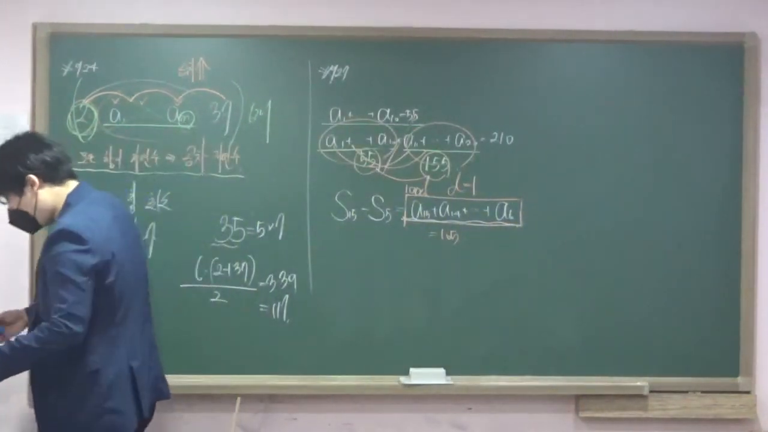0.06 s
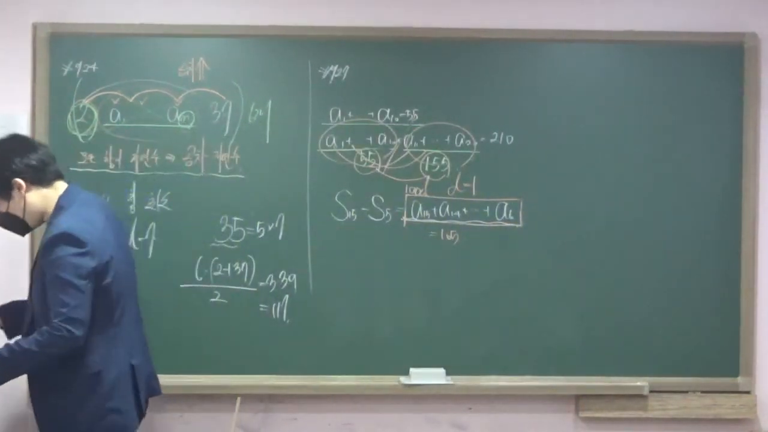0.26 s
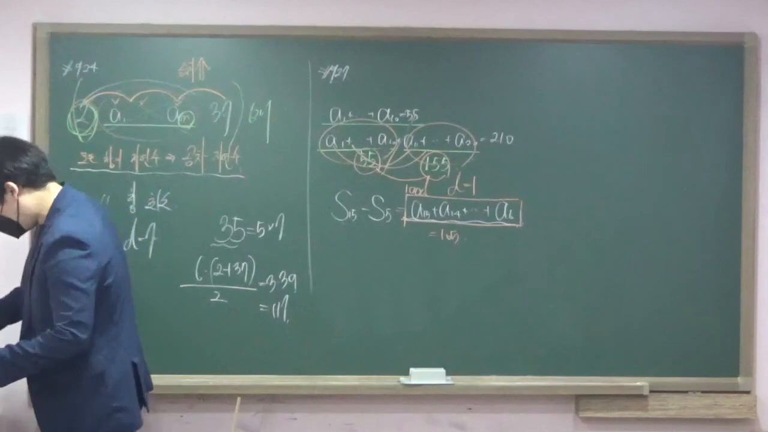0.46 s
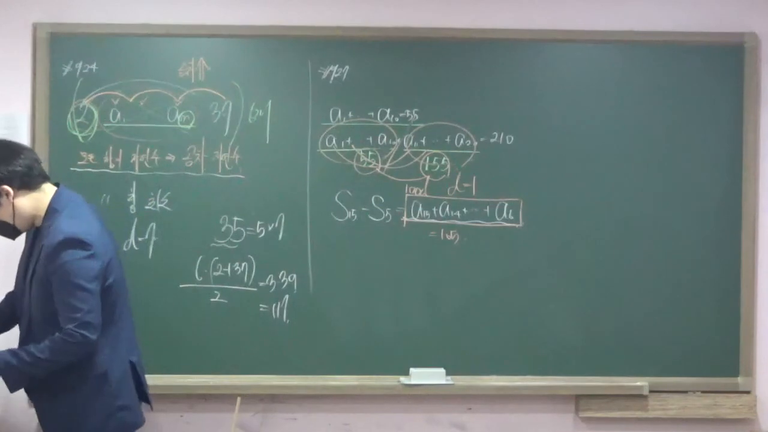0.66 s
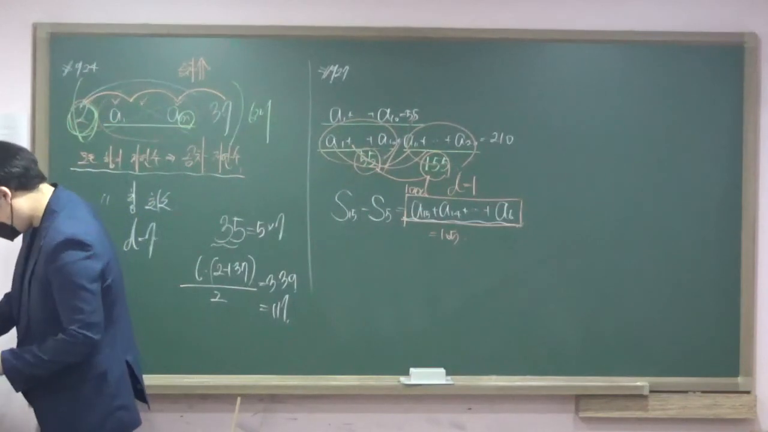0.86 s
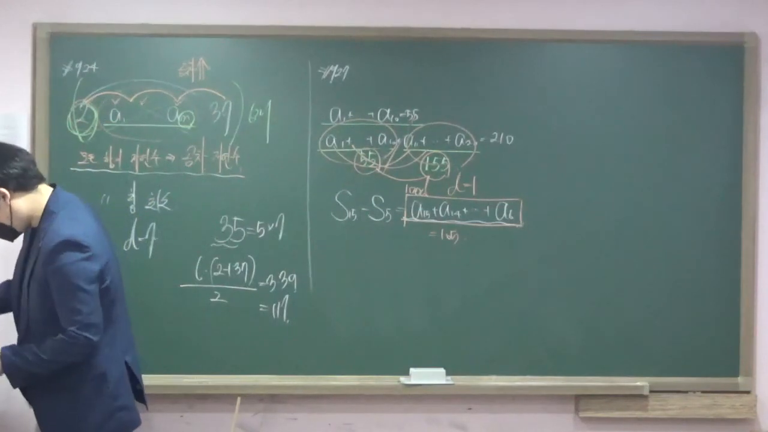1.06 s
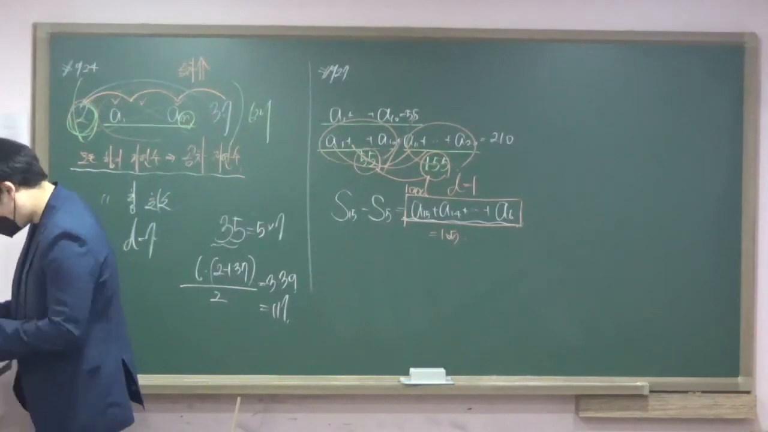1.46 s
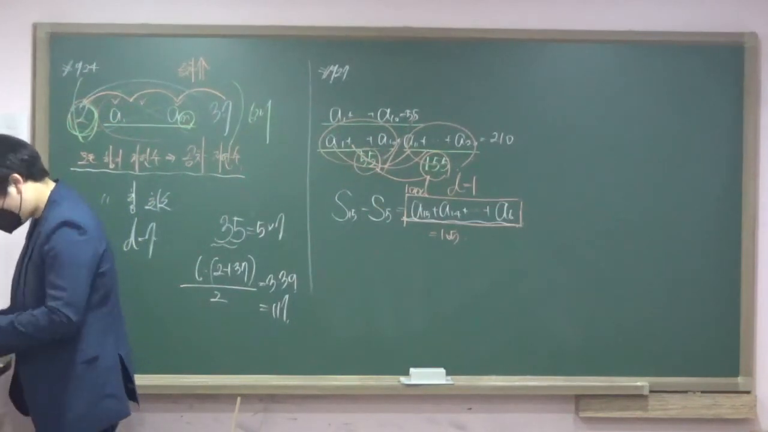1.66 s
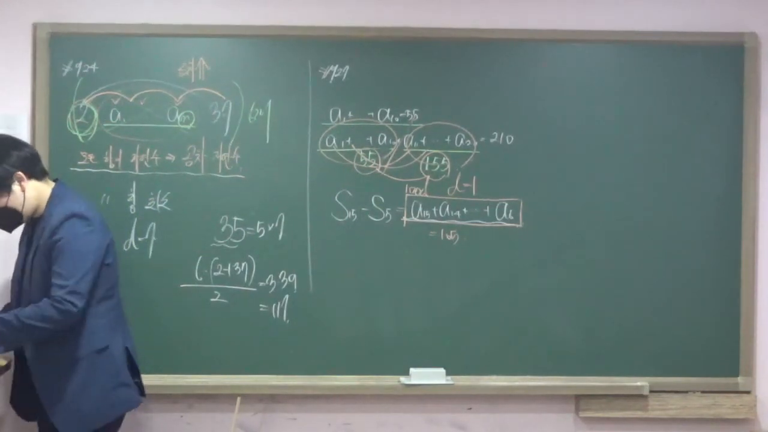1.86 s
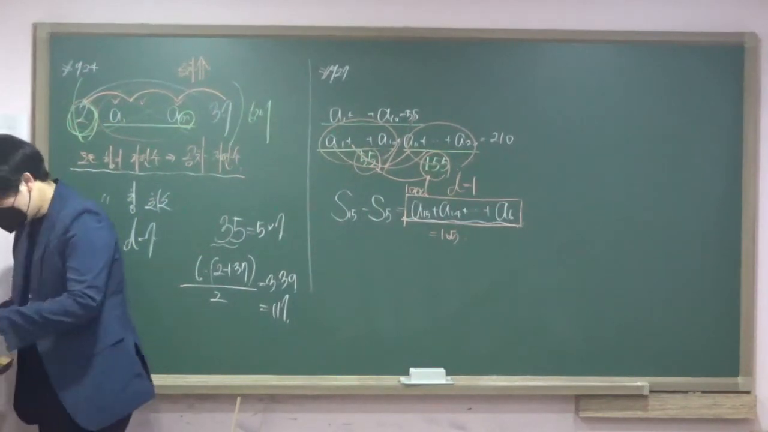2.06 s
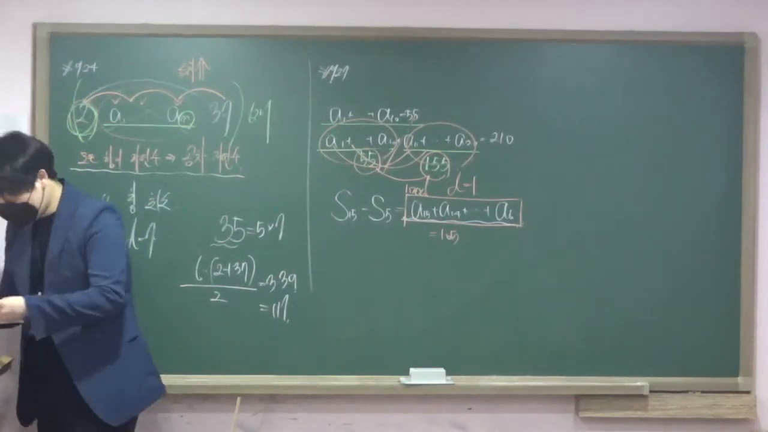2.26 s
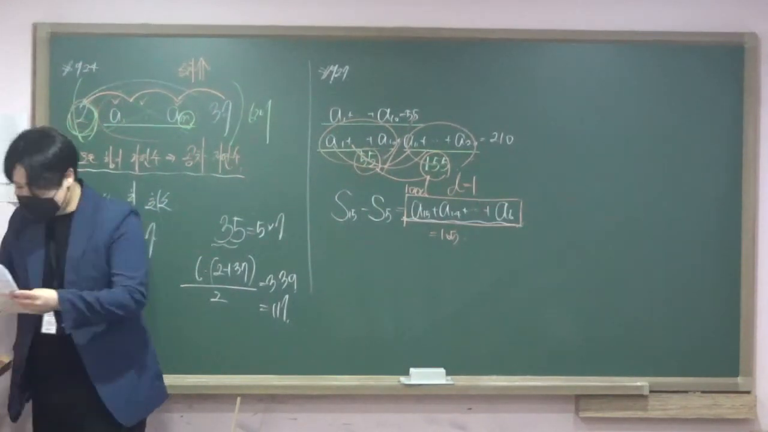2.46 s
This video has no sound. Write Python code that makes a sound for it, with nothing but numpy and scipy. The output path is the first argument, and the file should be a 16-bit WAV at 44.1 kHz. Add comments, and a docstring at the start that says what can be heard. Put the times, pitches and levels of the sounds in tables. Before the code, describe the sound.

Objects knock on a hollow desk, with sharp, ringing clacks at about 0.2, 0.5 and 0.8 seconds and paper sliding faintly between them. From 0.9 to 1.2 seconds the loudest knock breaks into a quick clatter as the object settles. Afterwards papers rustle softly with faint low bumps, tapping the desk between 1.6 and 2 seconds and sliding again near 2.5. Everything echoes in a classroom over low, steady ventilation.

```python
"""You hear things knocked and set down on a hollow desk in a bare classroom, and papers picked up.
Each knock makes a clack that rings the desk and echoes round the room; the last and heaviest one
clatters as the object settles. Between and after the knocks, paper rubs and taps on the desk and
soft bumps hum briefly. The ventilation adds a low, steady rush of air."""
import sys
import numpy as np
from scipy import signal
from scipy.fft import rfft, irfft
from scipy.io import wavfile

SR = 44100
rng = np.random.default_rng(int(sys.argv[2]) if len(sys.argv) > 2 else 0)


def dump_mix(stems):
    """Bounce the given channels to the path in sys.argv[1] as a 16-bit WAV at rate SR."""
    frames = np.atleast_2d(stems).T  # one column per channel
    limited = np.clip(frames, -1, 1)  # hard clip at full scale
    pcm = np.round(limited * 32767).astype(np.int16)
    wavfile.write(sys.argv[1], SR, pcm)


N = 114660
LEAD = 8820  # extra samples at the front, so a sound can begin before time zero
M = N + LEAD
AGE = np.arange(M) / SR  # seconds since a sound began
T = (np.arange(M) - LEAD) / SR  # seconds on the scene's clock
FREQ = np.maximum(np.arange(M + 1) * SR / (2 * M), 1)
SIDES = np.array([[1], [-1]])  # left ear = mid + side, right ear = mid - side

# Blows on the desk: t/s, level/dB, bass/dB, treble/dB, desk ring/dB, chatter fade/s,
# pitch of the struck spot/Hz, boost at that pitch/dB, crack/dB
KNOCK_BLOWS = [(-.03, -17.5, 13.5, 7.5, -17, 0.0067, 1190, 7, -36),
               (.214, -4.5, 7, 0.5, 1, 0.009, 1270, 6.5, -2),
               (0.255, -13.5, -1, 4, 1.5, 0.0053, 787, 11, 0),
               (0.416, -30, -20, -24, 13, .005, 1230, -3, -22),
               (.518, -8, 5.5, 7.5, 2.5, 0.01, 2090, 5, -8.5),
               (.553, -18.5, 9, 13, 2.5, .004, 1550, -8, -9),
               (0.79, -8.5, 6.5, 5, -5.5, 0.0076, 4630, 6.5, -12.5),
               (.844, -23.5, -4, 8, -0.5, 0.0056, 897, 20, -1.5),
               (.919, -9.5, 7.5, -17, 6, 0.005, 1194, 17, -2),
               (.956, -3, -5.5, 1.5, 0.5, 0.0041, 1900, 5, -8),
               (.977, 0, -10, -9.5, 2.5, 0.0088, 1360, 1, -24),
               (1.022, -6, -18, 3.5, -6.5, 0.013, 1050, -6, -3.5),
               (1.052, -4, 1, -6, 2, 0.011, 2200, 10.5, -12),
               (1.090, -4.5, -10.5, -1, -3.5, 0.0095, 1520, 3, -16),
               (1.127, -7.5, -9, -7, 3, 0.0029, 1370, 4.5, -14),
               (1.195, -36.5, -8, 6, -15, 0.01, 1670, 1, -6)]
# How much the two ears differ in the room: f/Hz, side compared with mid/dB
STEREO_WIDTH = [(60, -20), (170, -24), (240, -23.5), (330, -16.5), (550, -9), (2000, -6.5), (4000, -6.5),
                (9000, -8.5)]


def knocks(rooms, gain_db=23, spot_octaves=0.17, crack_rise_s=.006, crack_fade_s=0.014):
    """Each blow sends a clack round the room and a short crack straight to the listener."""
    # Tone of a knock: f/Hz, level/dB
    knock_tone = [(40, -10.5), (120, -9.5), (170, -2.5), (225, 3.5), (310, -3.5), (450, -1), (650, 4),
                  (850, 8), (1200, 5), (1600, 8), (2000, 2), (2500, 0), (3200, -4.5), (5000, -15),
                  (7500, -19.5), (11000, -30)]
    treble_lift_db = 1 / (1 + (5630 / FREQ) ** 2)
    crack_shape = np.exp(-AGE / crack_fade_s) * (1 - np.exp(-AGE / crack_rise_s))
    out = 0
    for k, (start, db, bass, treble, _, fade, spot_hz, spot_db, crack_db) in enumerate(KNOCK_BLOWS):
        # The spot that is struck boosts or weakens the sound near one pitch.
        spot = spot_db * np.exp(-.5 * (np.log2(FREQ / spot_hz) / spot_octaves) ** 2)
        tone = at(knock_tone, FREQ) + spot
        clack = colour(contact(fade), tone + blow_tone(FREQ, bass, treble))
        crack = colour(unit(rng.standard_normal(M) * crack_shape), tone + treble_lift_db)
        knock = echo(clack, rooms[k % len(rooms)]) + undb(crack_db) * crack
        out = out + undb(db + gain_db) * place(knock, start)
    return out


def contact(fade_s, chatter_db=-3):
    """Two things meet: a sharp push, then a brief chatter of the touching faces."""
    push = undb(chatter_db) * unit(rng.standard_normal(M) * np.exp(-AGE / fade_s))
    push[0] += 1
    return unit(push)


def blow_tone(hz, bass_db, treble_db):
    """Turn a blow's bass and treble up or down in dB, so it sounds deeper, duller or brighter."""
    return bass_db / (1 + (hz / 577) ** 4) + treble_db / (1 + (2040 / hz) ** 4)


def desk_ring(gain_db=-23, build_s=0.015, waver_hz=35, waver=.55, spread=0.35):
    """Every blow rings the same desk notes; the room makes them waver, differently in each ear."""
    # The desk's own notes, kept going by the room: f/Hz, level/dB, time to fade by 60 dB/s
    desk_notes = [(226.4, -6, 0.61), (436.8, -3.5, 0.28), (537, -7.5, 0.76), (568, 0.5, 0.3),
                  (761, -5.5, 0.9), (818, -13, 1), (848, -9, 1), (1141, 1, 0.47), (1187, 2.5, 0.56),
                  (1362, -2.5, 0.49), (1507, 0.5, 0.44), (1554, 2, 0.47), (1628, 6, 0.38),
                  (1922, 1.5, 0.38)]
    times, db, bass, treble, ring_db, *_ = np.array(KNOCK_BLOWS).T
    starts = np.round(times * SR).astype(int) + LEAD
    out = 0
    for hz, note_db, t60 in desk_notes:
        strength = undb(db + ring_db + note_db + blow_tone(hz, bass, treble))
        blows = np.zeros(M, complex)
        blows[starts] = strength * np.exp(2j * np.pi * rng.random(len(times)))
        step = np.exp((2j * np.pi * hz - np.log(1000) / t60) / SR)  # one sample of swinging and fading
        ring = signal.lfilter([1], [1, -step], blows)
        # Taking away a faster-fading copy makes the note swell in.
        ring -= signal.lfilter([1], [1, -step * np.exp(-1 / (build_s * SR))], blows + 1e-18)
        mid, side = (wander(waver_hz) + 1j * wander(waver_hz) for _ in range(2))
        out = out + (ring * (1 + waver * mid + SIDES * spread * side)).imag
    return undb(gain_db) * out


def paper(room, slide_db=-38, release_s=.02, crinkle_db=6.5, crinkle_hz=250.7, tap_db=-4):
    """Sheets slide with a crinkly hiss, and the stack taps on the desk."""
    # Sliding sheets: t/s, swell/s, hold/s, level/dB
    slides = [(-.05, 0.032, 0.11, -3), (0.292, 0.028, 0.4, -1), (0.92, 0.011, 0.11, 9),
              (1.262, 0.07, 0.16, -11), (1.492, 0.038, 0.25, -13), (1.757, 0.034, 0.031, -4),
              (1.854, 0.058, 0.03, -3.5), (2.04, 0.043, 0.089, -17.5), (2.41, 0.19, .1, -11.5)]
    # Light taps of the stack: t/s, level/dB, chatter fade/s
    stack_taps = [(.189, 2, 0.0066), (1.606, -9, .008), (1.81, -1, 0.01), (1.957, 1, 0.0034)]
    # Tone of paper: f/Hz, level/dB
    paper_tone = [(100, -10), (500, -18.5), (1200, 5), (2400, 4), (3600, -1.5), (6000, -3.5), (8500, -12.5),
                  (11000, -16)]
    effort = taps = 0
    for start, swell, hold, db in slides:
        rise = np.clip((T - start) / swell, 0, 1)
        fall = np.exp(-np.maximum(T - start - swell - hold, 0) / release_s)
        effort = effort + undb(db) * rise * fall
    hiss = undb(slide_db + crinkle_db * wander(crinkle_hz)) * effort * rng.standard_normal(M)
    for start, db, fade in stack_taps:
        tap = undb(tap_db + db) * contact(fade, chatter_db=10.5)
        taps = taps + place(tap[None], start)[0]
    hiss, taps = colour(np.array([hiss, taps]), at(paper_tone, FREQ))
    return echo(hiss + taps, room) + undb(-5) * taps  # the taps also come straight to the listener


def bumps(attack_s=0.0055, waver=0.22, waver_hz=40):
    """Soft bumps against the desk hum on briefly, each on one low, wavering note."""
    # Bumps and shuffles: t/s, level/dB, f/Hz, time to fade by 60 dB/s
    soft_bumps = [(0.038, -38, 540, 0.78), (0.121, -34.5, 121, 0.27), (.86, -42, 33, .4),
                  (1.409, -36, 140, 0.18), (1.478, -36.5, 215.2, 0.86), (1.811, -33, 212.6, 0.25),
                  (1.93, -39.5, 555, 0.37), (1.981, -34.5, 296, 0.19), (2.04, -37, 568, .4),
                  (2.153, -37, 268, 0.18), (2.21, -40.5, 202.3, 0.57), (2.564, -36.5, 177, 0.45)]
    out = 0
    for start, db, hz, t60 in soft_bumps:
        level = undb(db) * (1 + waver * wander(waver_hz))
        shape = undb(-60 * AGE / t60) * (1 - np.exp(-AGE / attack_s))
        hum = level * shape * np.sin(2 * np.pi * hz * AGE)
        out = out + place(hum[None], start)
    return out


def ventilation(gain_db=-42.5):
    """Moving air makes a steady low rush that sounds wider towards the treble."""
    # Tone of the air: f/Hz, level/dB
    air_tone = [(15, -67), (25, -13), (64, -5.5), (85, -14), (145, -8), (241, -2), (311, -5.5), (344, -9),
                (381, -6.5), (456, -6), (492, -9.5), (819, -13), (930, -12.5), (1230, -14.5), (1400, -18.5),
                (1850, -22.5), (11000, -43), (14300, -43), (22000, -120)]
    mid, side = colour(rng.standard_normal((2, M)), at(air_tone, FREQ))
    return undb(gain_db) * stereo(mid, side) / np.std(mid)


def classroom(direct_db=-32, early_db=-15, early_fade_s=0.036):
    """The room's answer to one click: the click itself, early echoes and a long tail."""
    # How long the room rings: f/Hz, time to fade by 60 dB/s
    ring_times = [(125, 1), (300, 1), (700, 1), (1400, 0.68), (3000, 0.58), (6000, 0.51), (10000, 0.63)]
    noise = rfft(rng.standard_normal((2, M)), 2 * M)
    early = undb(early_db) * unit(np.exp(-AGE / early_fade_s))
    octaves_hz = 62.5 * 2 ** np.arange(9)
    out = 0
    for k, hz in enumerate(octaves_hz):
        share = np.interp(np.log(FREQ), np.log(octaves_hz), np.eye(len(octaves_hz))[k])
        band = irfft(noise * share)[:, :M]
        build = 1 - np.exp(-AGE / (0.036 * 250 / hz))  # lower sounds build up later
        tail = unit(undb(-60 * AGE / at(ring_times, hz)))
        out = out + band * build * np.hypot(tail, early)
    mid, side = out
    mid[0] += undb(direct_db)
    return stereo(mid, side)


def echo(x, room):
    """Play a sound in the room."""
    return signal.fftconvolve(x[None], room, axes=1)[:, :M]


def stereo(mid, side):
    """Make left and right from what the ears share (mid) and how they differ (side)."""
    return mid + SIDES * colour(side, at(STEREO_WIDTH, FREQ))


def colour(x, db):
    """Turn each frequency up or down by its value in dB."""
    cepstrum = irfft(np.log(undb(db)))
    # Folding this onto its first half keeps the filter from ringing before the sound starts.
    cepstrum[1:M] *= 2
    cepstrum[M + 1:] = 0
    return irfft(rfft(x, 2 * M) * np.exp(rfft(cepstrum)))[..., :M]


def place(x, start_s):
    """Delay a sound to start at the given time."""
    delay = int(np.clip(round(start_s * SR) + LEAD, 0, M - 1))
    return np.pad(x, ((0, 0), (delay, 0)))[:, :M]


def wander(rate):
    """Random values joined by straight lines, `rate` of them a second."""
    return np.interp(AGE * rate, np.arange(1000), rng.standard_normal(1000))


def at(table, hz):
    """Read between the rows of a table, with octaves evenly spaced."""
    freqs, values = np.array(table).T
    return np.interp(np.log(hz), np.log(freqs), values)


def undb(db):
    """Turn decibels into a number to multiply by."""
    return 10 ** (np.asarray(db) / 20)


def unit(x):
    """Scale to an energy of 1."""
    return x / np.sqrt(np.sum(x ** 2) + 1e-18)


def scene(right_louder_db=0.66):
    """Knocks, paper, bumps and ventilation together in the classroom."""
    rooms = [classroom() for _ in range(4)]  # four echo patterns of the same room
    mix = knocks(rooms) + desk_ring() + paper(rooms[0]) + bumps() + ventilation()
    return (mix * undb(-SIDES * right_louder_db / 2))[:, LEAD:]


def record(dry):
    """Round off the loudest peaks and cut the highest treble."""
    ceiling, top_hz = 1.1, 11080
    rounded = ceiling * np.tanh(dry / ceiling)
    return signal.sosfilt(signal.ellip(12, .2, 80, top_hz, fs=SR, output="sos"), rounded)


dry = scene()
out = record(dry)
dump_mix(out)
```